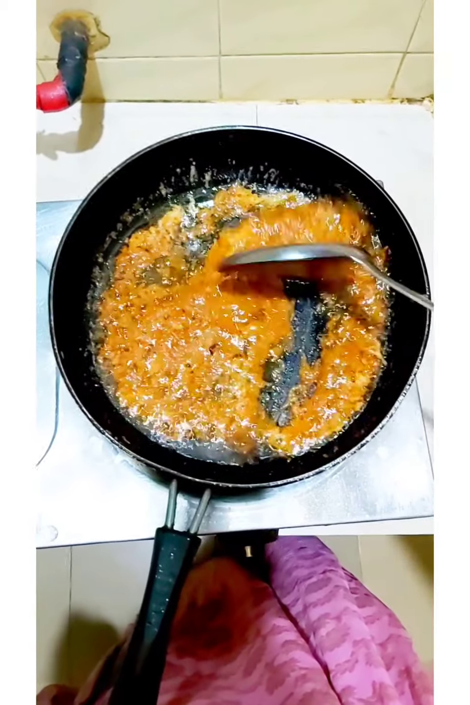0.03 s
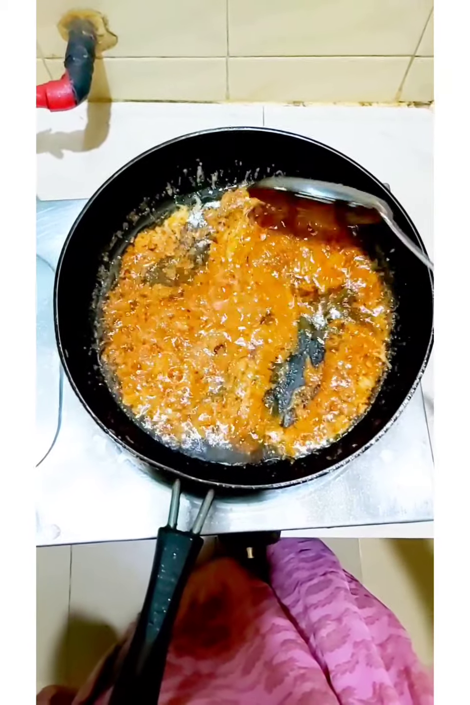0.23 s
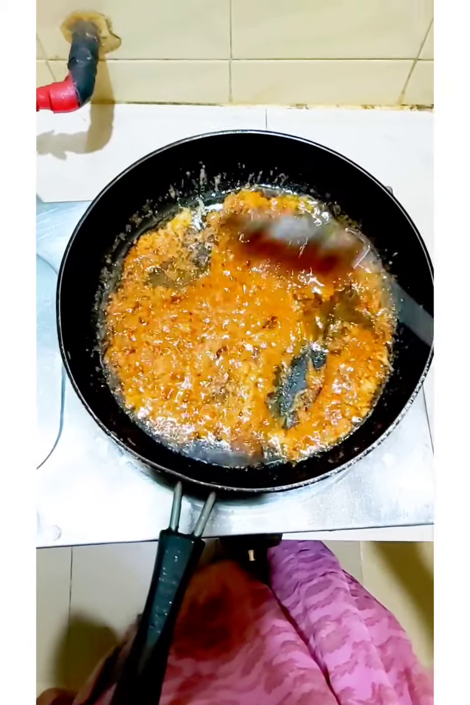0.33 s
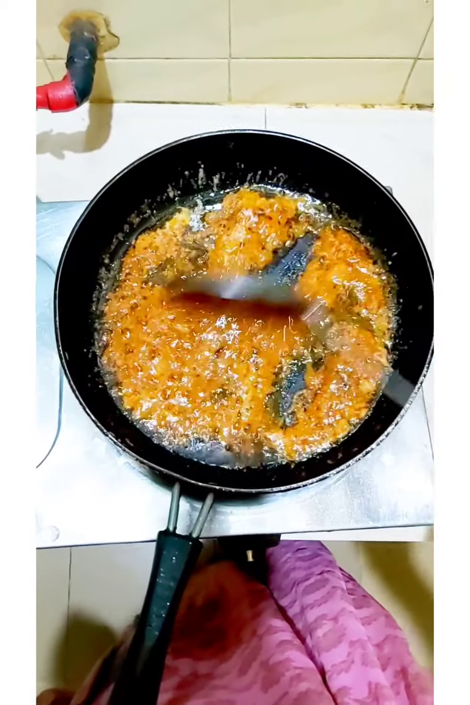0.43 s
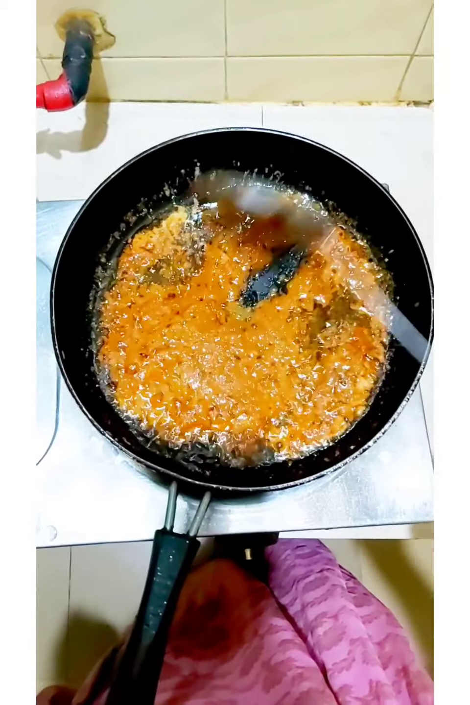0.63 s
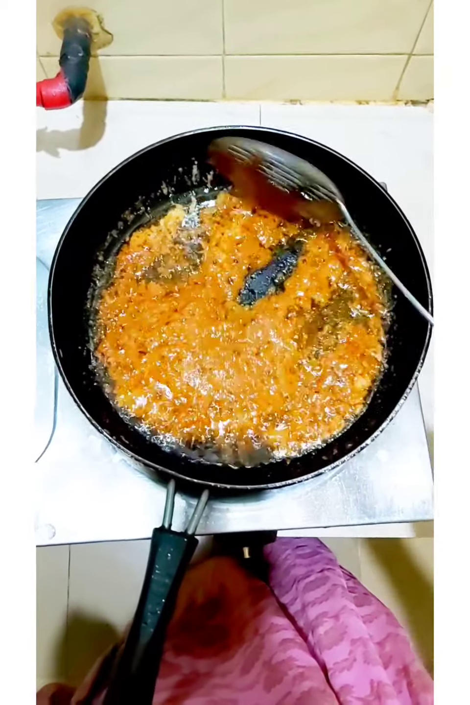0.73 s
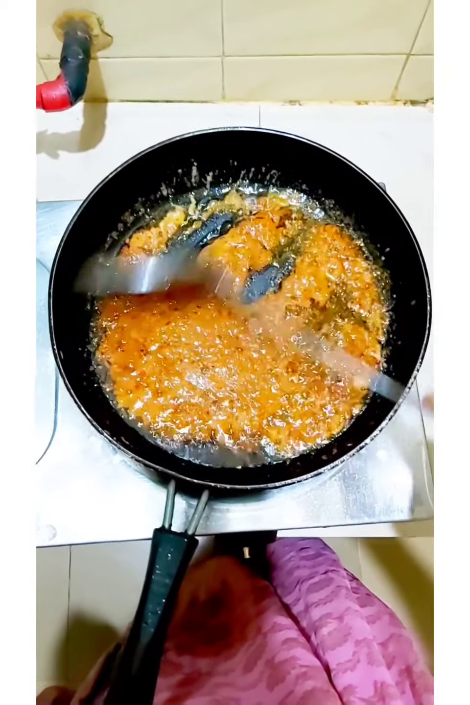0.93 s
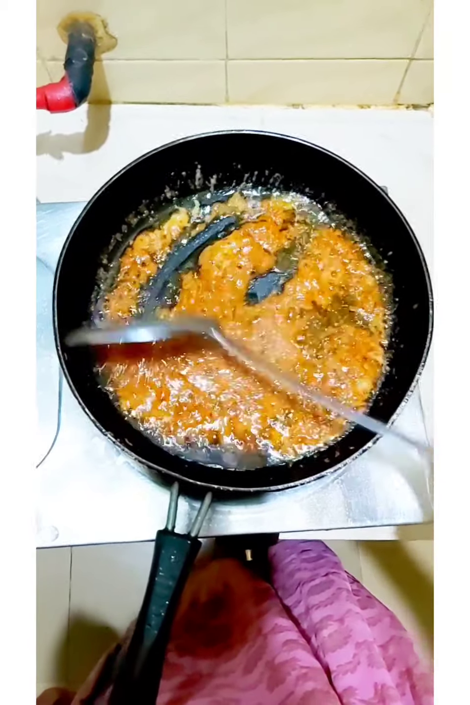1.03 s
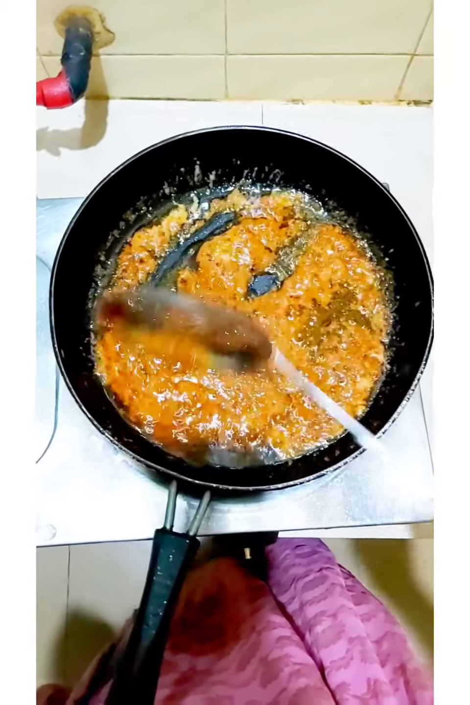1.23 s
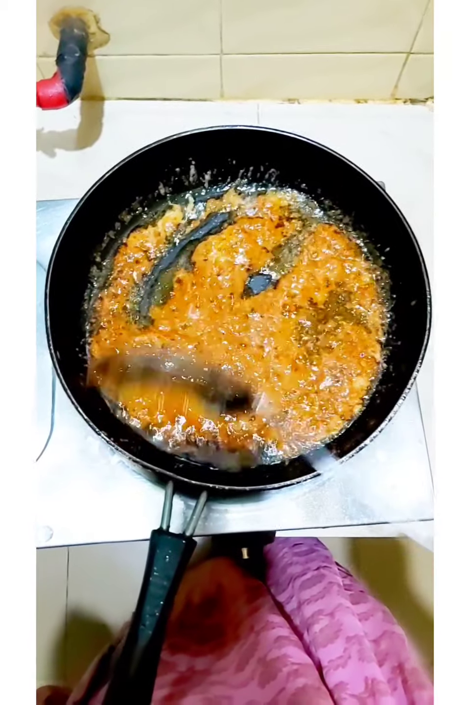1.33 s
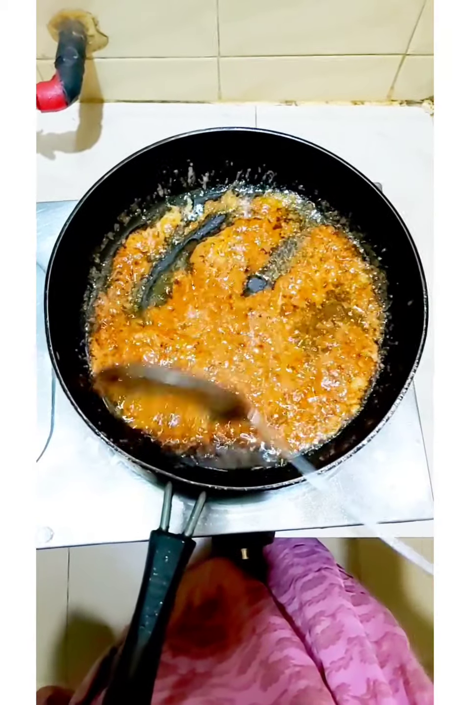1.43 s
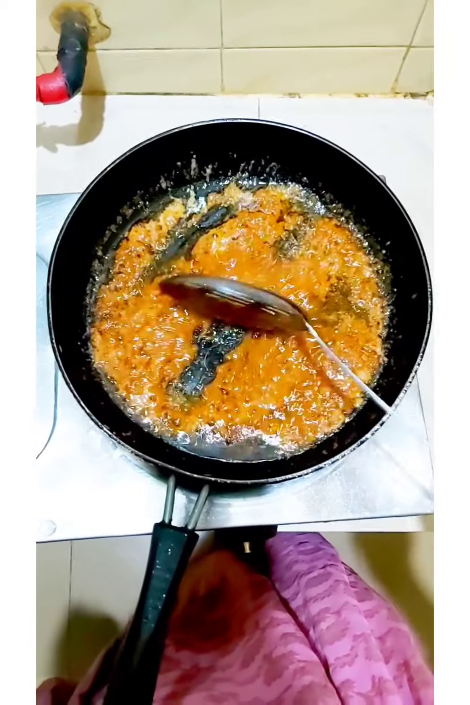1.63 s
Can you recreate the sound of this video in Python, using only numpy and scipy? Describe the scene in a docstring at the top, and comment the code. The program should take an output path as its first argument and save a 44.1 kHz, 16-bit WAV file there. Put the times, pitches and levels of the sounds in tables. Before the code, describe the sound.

Metal spoon stirring a frying pan: three dull knocks, each with a gritty scrape, amid constant sizzle

```python
"""Spice paste fries in a nonstick pan in a small kitchen: random pops and hiss make a sizzle throughout.
Three times a metal spoon lands with a dull knock: damped thuds and clacks, ringing pan tones and a noisy
crack, while the stove top booms softly. The spoon then judders (random slips shake the base) and scrapes
(random clicks of grit) with a wet, gritty sound. During each stroke the sizzle flares where hot metal is bared."""
import sys
import numpy as np
from scipy import signal
from scipy.fft import rfft, irfft
from scipy.io import wavfile
from scipy.ndimage import uniform_filter1d

SR = 44100
rng = np.random.default_rng(int(sys.argv[2]) if len(sys.argv) > 2 else 0)


def store_pcm(level_fs):
    """Save levels as 16-bit WAV."""
    pcm = np.round(np.clip(level_fs, -1, 1) * 32767).astype(np.int16)
    wavfile.write(sys.argv[1], SR, np.atleast_2d(pcm).T)


N = 74970
T = np.arange(N) / SR  # time [s]

# All levels in the tables are relative to the other parts of the same sound.
# the spoon lands and rebounds: (time [s], thud level [dB], thud pitch [Hz], ring level [dB],
# clack level [dB], crack level [dB], top of the crack [Hz])
KNOCKS = [(0.2217, -0.5, 510, 1, -0.5, -3.5, 11100), (0.2302, -16, 507, -8, -30, -17, 6000),
          (0.2409, -22, 535, -13.5, -26, -29, 6000), (0.2514, -16, 525, -17, -24, -28, 5000),
          (0.7157, -5.5, 504, -1.5, 5.5, 0, 14900), (0.7212, -13.5, 453, -39, -8.5, -24, 9000),
          (1.3992, -11, 475, -9, -24, -1, 4500), (1.4116, -14, 560, -21.5, -21, -20, 3500)]
# ringing tones of the pan, damped by the paste: (frequency [Hz], level [dB], time to fall 60 dB [s])
PAN_TONES = [(243.5, -0.5, 0.55), (352.6, 4.5, 0.22), (414, 3.5, 0.15), (494, -23, 0.15), (588.4, 8, 0.17),
             (675, -7, 0.49), (706, -38, 0.13), (860, 3, 0.067), (903, -26, 0.07), (1016, -5, 0.22),
             (1432, -5, 0.18), (1836, -6, 0.16), (2415, -19, 0.14), (2910, -29, 0.1)]
# colour of the contact crack: (frequency [Hz], level per Hz [dB])
CRACK_COLOUR = [(120, -33), (700, -3), (1200, 2.5), (1900, -2), (3000, -1.5), (4200, -6.5), (8000, -10),
                (15000, -16.5)]
# the spoon's drag, one list a stroke: (time [s], judder level [dB], judder pitch [Hz], scrape level [dB])
STROKES = [
    [(.2, -72, 334, -76), (.228, -23, 339, -46), (.262, -34, 260, -72), (.298, -28, 400, -38),
     (.322, -26, 382, -38), (.34, -38, 357, -33.5), (.385, -31, 315, -29.5), (.43, -39.5, 287, -34.5),
     (.48, -45, 263, -50.5), (.6, -52.5, 283, -45)],
    [(.695, -56, 292, -35.5), (.725, -29, 281, -51), (.78, -48, 262, -57), (.81, -31, 362, -37.5),
     (.838, -29, 366, -34), (.91, -36.5, 298, -35), (.94, -34.5, 286, -37), (.98, -30.5, 330, -35),
     (1.022, -37.5, 376, -34), (1.045, -44, 295, -49), (1.17, -58, 295, -52)],
    [(1.375, -69, 300, -50), (1.405, -62, 353, -28), (1.44, -35, 292, -61), (1.47, -36, 265, -34),
     (1.49, -65, 340, -35.5), (1.53, -40, 397, -37.5), (1.575, -54.5, 313, -51), (1.63, -62, 322, -51.5),
     (1.7, -64, 320, -64)],
]
# the pan's base flexes under the slips: (frequency [Hz], width [Hz], level [dB])
BASE_FLEX = [(230, 22, -3.5), (329, 53, -12), (420, 29, -3), (513, 38, -5), (674, 27, -11.5)]
# colour of the scrape: (frequency [Hz], level per Hz [dB])
SCRAPE_COLOUR = [(25, -33), (80, -2), (140, -13), (300, -3), (700, 2), (1100, 3), (1700, -6), (2600, -1.5),
                 (5000, -11.5), (9000, -38.5), (15000, -28)]
# the spoon sings faintly as it is dragged: (frequency [Hz], width [Hz], level [dB])
SPOON_TONES = [(1310, 18, -35), (2295, 40, -28), (4500, 110, -31), (5600, 21, -25)]
# vigour of the frying: (time [s], level [dB])
FRYING = [(0, -37.5), (.18, -37.5), (.3, -38.5), (.42, -34), (.54, -38), (.66, -39.5), (.8, -36.5),
          (1.0, -36), (1.15, -38), (1.3, -38.5), (1.44, -37), (1.53, -33), (1.62, -36.5), (1.7, -38.5)]
# colour of the sizzle: (frequency [Hz], level per Hz [dB])
SIZZLE_COLOUR = [(30, -6), (110, -5.5), (250, 2), (650, 3), (1400, 5.5), (2100, 0), (3300, 1), (4300, -1.5),
                 (5400, -2), (9600, -5), (11800, -4), (15500, -5.5)]
# the hollow of the pan colours the sizzle: (frequency [Hz], width [Hz], boost [dB])
PAN_HOLLOW = [(565, 53, 5.5), (1530, 180, 0.5), (1930, 75, 5), (2340, 115, 6), (3270, 180, -3),
              (4630, 310, 3)]
# fresh paste spits on bared metal: (time of the peak [s], length [s], level [dB])
FLARES = [(.42, 0.046, -50), (.96, .09, -54), (1.546, 0.1, -48)]
# the stove top booms after each knock: (time [s], level [dB])
BOOMS = [(.222, -44), (.716, -46), (1.40, -37.5)]
# how alike left and right are in scattered sound: (frequency [Hz], likeness [-1 to 1])
LIKENESS = [(60, 0.79), (300, 1), (700, 0.73), (1300, -0.12), (2500, 0.15), (5000, -0.11), (15000, 0)]
# left minus right in scattered sound: (frequency [Hz], level difference [dB])
LEAN = [(100, 1.5), (250, 3), (600, -0.5), (1200, -2.5), (2400, 0.5), (4400, -0.9), (8100, 6), (11000, 0),
        (15000, -.8)]

# knocks; a spread is the ratio of a band's edge to its middle
THUD_DB, THUD_SPREAD = -1.5, 1.405
CLACK_HZ, CLACK_SPREAD, CLACK_DB = 1139, 1.26, -13.5
RING_DB, RING_LOW_HZ = -26, 161
CRACK_DB, CRACK_DECAY_S = -21.5, 0.0025
# judder
SLIPS_PER_S, SLIP_SPREAD_DB = 760, 1.5
JUDDER_WIDTH_HZ, JUDDER_LOW_HZ = 36.3, 185
CHATTER_DB, FLEX_DB = -3, -1.5
# scrape
GRITS_PER_S, GRIT_SPREAD_DB = 1500, 3
CLUMP_HZ, CLUMP_DB = 97, 2.5
SCRAPE_DB, SCRAPE_RING_DB, SCRAPE_RING_LOW_HZ = -2.5, -9, 1170
# sizzle
POPS_PER_S, POP_SPREAD_DB, POP_DB, HISS_DB = 4000, 2, -7.5, -6.5
FLARE_LOW_HZ = 7000
FLUTTER_HZ, FLUTTER_DB = 22.5, 0.9
# stove
STOVE_HZ, STOVE_T60_S, STOVE_RISE_S, STOVE_RUMBLE_DB = 80.7, 0.44, 0.015, -3
# kitchen; the left is raised and the right lowered by LEFT_DB
LEFT_LEAD_S, LEFT_DB = 0.00017, 0.9
ROOM_T60_S, ROOM_GAP_S = 0.14, 0.0045
KNOCK_ROOM_DB, CRACK_ROOM_DB, JUDDER_ROOM_DB, SCRAPE_ROOM_DB = -7, 5, -7, 0
CUTOFF_HZ = 15680


def knocks():
    """Each landing: a short thud of the base, a clack of the spoon's bowl, the pan's ring and a brief crack."""
    thuds, clacks, force, crack = 0, 0, 0, 0
    for s, thud_db, thud_hz, ring_db, clack_db, crack_db, top_hz in KNOCKS:
        thuds = thuds - from_db(THUD_DB + thud_db) * damped_blow(s, thud_hz, THUD_SPREAD)
        clacks = clacks - from_db(CLACK_DB + clack_db) * damped_blow(s, CLACK_HZ, CLACK_SPREAD)
        force = force - from_db(RING_DB + ring_db) * click(s)
        burst = dying(s, CRACK_DECAY_S) * rng.standard_normal(N)
        burst = butter(burst, min(top_hz, CUTOFF_HZ), "low")
        crack = crack + from_db(CRACK_DB + crack_db) * burst
    ringing = pan_ring(butter(force, RING_LOW_HZ, "high"))
    body = in_kitchen(thuds + clacks + ringing, KNOCK_ROOM_DB)
    return body + in_kitchen(colour(crack, CRACK_COLOUR), CRACK_ROOM_DB)


def damped_blow(s, hz, spread):
    """A click through a wide band: a tone that dies at once, with peak height 1."""
    band = signal.butter(3, [hz / spread, hz * spread], "band", fs=SR, output="sos")
    wave = signal.sosfilt(band, click(s) + 1e-18)
    return wave / np.abs(wave).max()


def pan_ring(force):
    """A force on the pan sets all its tones ringing, each dying at its own pace."""
    return sum(from_db(db) * ring(force, hz, t60) for hz, db, t60 in PAN_TONES)


def drag():
    """While the spoon touches the pan, it judders over the base and scrapes through the grit."""
    s, judder_db, judder_hz, scrape_db = np.transpose(np.concatenate(STROKES))
    touching = sum((T >= stroke[0][0]) & (T <= stroke[-1][0]) for stroke in STROKES)
    shaking = touching * from_db(np.interp(T, s, judder_db)) * judder(np.interp(T, s, judder_hz))
    scraping = touching * from_db(np.interp(T, s, scrape_db)) * scrape()
    return in_kitchen(shaking, JUDDER_ROOM_DB) + in_kitchen(scraping, SCRAPE_ROOM_DB)


def judder(pitch_hz):
    """The spoon sticks and slips: the slips chatter at a wavering pitch and flex the base."""
    slips = grains(SLIPS_PER_S, SLIP_SPREAD_DB)
    # keep only the slips' sound close to the moving pitch: shift it to 0 Hz, filter, shift back
    turn = np.exp(2j * np.pi * np.cumsum(pitch_hz) / SR)
    near_pitch = turn * butter(slips / turn, JUDDER_WIDTH_HZ / 2, "low")
    chatter = evened(np.real(near_pitch))
    flex = resonances(slips, BASE_FLEX)
    for _ in range(2):
        flex = butter(flex, JUDDER_LOW_HZ, "high")
    return from_db(CHATTER_DB) * chatter + from_db(FLEX_DB) * evened(flex)


def scrape():
    """Clumps of spice grit rasp under the spoon's edge and make pan and spoon ring."""
    clumps = from_db(CLUMP_DB * flutter(CLUMP_HZ))
    grit = evened(grains(GRITS_PER_S, GRIT_SPREAD_DB) * clumps)
    rasp = from_db(SCRAPE_DB) * colour(grit, SCRAPE_COLOUR)
    ringing = rms_one(pan_ring(butter(grit, SCRAPE_RING_LOW_HZ, "high")))
    return rasp + from_db(SCRAPE_RING_DB) * ringing + resonances(grit, SPOON_TONES)


def sizzle():
    """Countless steam bubbles burst all over the pan as pops and hiss; each stroke adds a bright flare."""
    bursts = from_db(POP_DB) * pops() + from_db(HISS_DB) * rng.standard_normal((2, N))
    frying = rms_one(hollow(colour(scatter(bursts), SIZZLE_COLOUR)))
    steady = from_db(np.interp(T, *np.transpose(FRYING))) * frying
    swell = sum(from_db(db) * np.exp(-.5 * ((T - s) / length) ** 2) for s, length, db in FLARES)
    flare = swell * rms_one(butter(pops(), FLARE_LOW_HZ, "high"))
    return (steady + flare) * from_db(FLUTTER_DB * flutter(FLUTTER_HZ))


def pops():
    """Bursting bubbles: random clicks, drawn separately for left and right."""
    return np.array([grains(POPS_PER_S, POP_SPREAD_DB) for side in range(2)])


def hollow(x):
    """The air in the pan resonates and boosts some bands of the sizzle."""
    for hz, width, db in PAN_HOLLOW:
        boost = (from_db(db) - 1) * 2 * np.pi * width / SR
        x = x + boost * ring(x, hz, width_to_t60(width))
    return x


def stove():
    """The stove top answers each knock with a low boom and a rumble that take a moment to build."""
    decay_s = STOVE_T60_S / np.log(1000)
    shake = sum(from_db(db) * (dying(s, decay_s) - dying(s, STOVE_RISE_S)) for s, db in BOOMS)
    boom = np.sin(2 * np.pi * STOVE_HZ * T)
    rumble = rms_one(butter(scatter(rng.standard_normal((2, N))), STOVE_HZ, "low"))
    return shake * (boom + from_db(STOVE_RUMBLE_DB) * rumble)


def in_kitchen(x, room_db):
    """Direct sound reaches the left first; tiled walls add a short wash of fading random echoes."""
    left = x * from_db(LEFT_DB)
    right = np.interp(T - LEFT_LEAD_S, T, x) / from_db(LEFT_DB)
    walls = scatter(rng.standard_normal((2, N))) * dying(ROOM_GAP_S, ROOM_T60_S / np.log(1000))
    wash = signal.fftconvolve(x[None], rms_one(walls) / np.sqrt(N))[:, :N]
    return np.array([left, right]) + from_db(room_db) * wash


def scatter(pair):
    """Mix two unrelated signals into a left and right that are most alike in the bass."""
    hz = np.arange(N // 2 + 1) * SR / N
    angle = np.arcsin(np.clip(at_hz(LIKENESS, hz), -.99, .99)) / 2
    lean = from_db(at_hz(LEAN, hz) / 2)  # half of the difference on each side
    a, b = rfft(pair)
    left = lean * (a * np.cos(angle) + b * np.sin(angle))
    right = (b * np.cos(angle) + a * np.sin(angle)) / lean
    return irfft([left, right], N)


def ring(x, hz, t60):
    """One tone that a unit click sets ringing at height 1, falling 60 dB in t60 seconds."""
    r = np.exp(-np.log(1000) / (t60 * SR))
    w = 2 * np.pi * hz / SR
    return signal.lfilter([.5, 0, -.5], [1, -2 * r * np.cos(w), r * r], x + 1e-18)


def width_to_t60(width):
    """The wider a resonance [Hz], the sooner it falls by 60 dB [s]."""
    return np.log(1000) / (np.pi * width)


def resonances(x, table):
    """Drive resonances listed as (frequency [Hz], width [Hz], rms level [dB])."""
    return sum(from_db(db) * rms_one(ring(x, hz, width_to_t60(width))) for hz, width, db in table)


def grains(per_s, spread_db):
    """Random clicks of uneven size and sign, with rms 1."""
    sizes = from_db(spread_db * np.minimum(rng.exponential(1, N), 5))
    signs = rng.choice([-1, 1], N)
    return rms_one(sizes * signs * (rng.random(N) < per_s / SR))


def flutter(top_hz):
    """A random wander with rms 1, mostly slower than top_hz."""
    wander = butter(rng.standard_normal(N + 8000), top_hz, "low")
    return rms_one(wander[8000:])  # skip the filter's start


def click(s):
    """A single sample of height 1 at time s."""
    return 1.0 * (np.arange(N) == int(s * SR))


def dying(s, decay_s):
    """A sudden start at time s, then an exponential fall."""
    return (T >= s) * np.exp(-np.abs(T - s) / decay_s)


def evened(x):
    """Hold the level steady over about 30 ms."""
    return x / np.sqrt(np.abs(uniform_filter1d(x ** 2, size=1300)) + 1e-12)


def colour(x, spectrum):
    """Give a sound the listed spectrum, with no sound before its cause (minimum phase) and unit power gain."""
    size = 2 * N
    gain = rms_one(from_db(at_hz(spectrum, np.arange(N + 1) * SR / size)))
    cepstrum = irfft(np.log(gain))
    cepstrum[1:N] *= 2
    cepstrum[N + 1:] = 0
    return irfft(rfft(x, size) * np.exp(rfft(cepstrum)))[..., :N]


def butter(x, hz, kind):
    """Second-order filter that keeps the lows or the highs."""
    return signal.sosfilt(signal.butter(2, hz, kind, fs=SR, output="sos"), x + 1e-18)


def at_hz(points, hz):
    """Read a table between its points, on a log-frequency axis."""
    f, v = np.transpose(points)
    return np.interp(np.log(hz + 1e-9), np.log(f), v)


def from_db(db):
    """Turn decibels into a gain."""
    return 10 ** (np.asarray(db) / 20)


def rms_one(x):
    """Scale to an rms level of 1."""
    return x / np.sqrt(np.mean(x ** 2) + 1e-20)


def scene():
    """Spoon and pan in front, frying oil and stove behind."""
    return knocks() + drag() + sizzle() + stove()


def record(dry):
    """Peaks stop at full scale; the top of the spectrum is cut steeply."""
    lowpass = signal.ellip(12, .1, 80, CUTOFF_HZ, fs=SR, output="sos")
    return signal.sosfilt(lowpass, np.clip(dry, -1, 1))


dry = scene()
out = record(dry)
store_pcm(out)
```